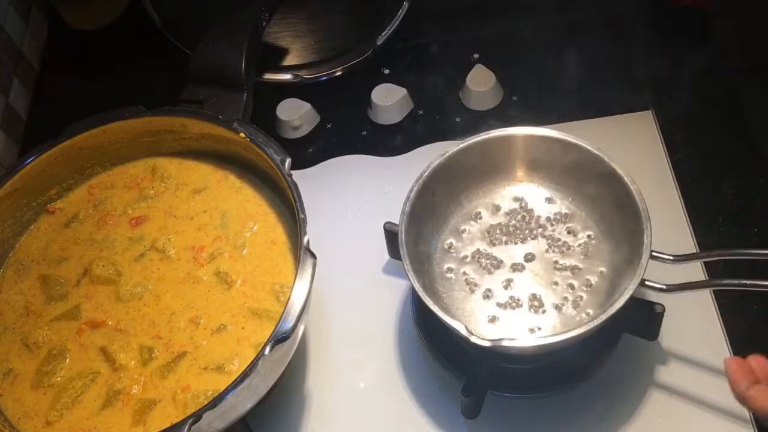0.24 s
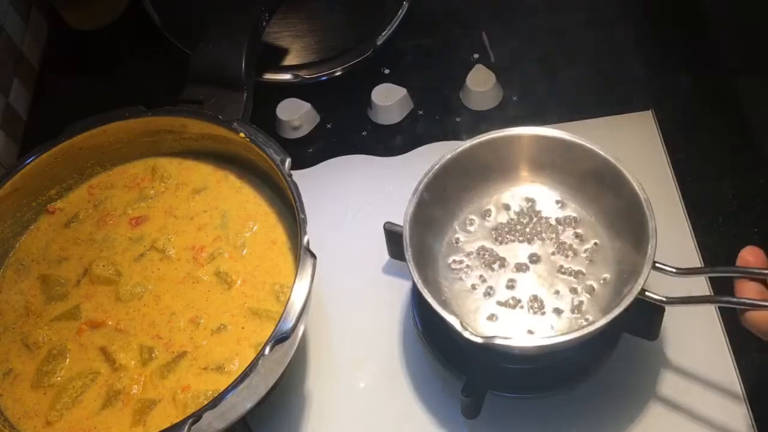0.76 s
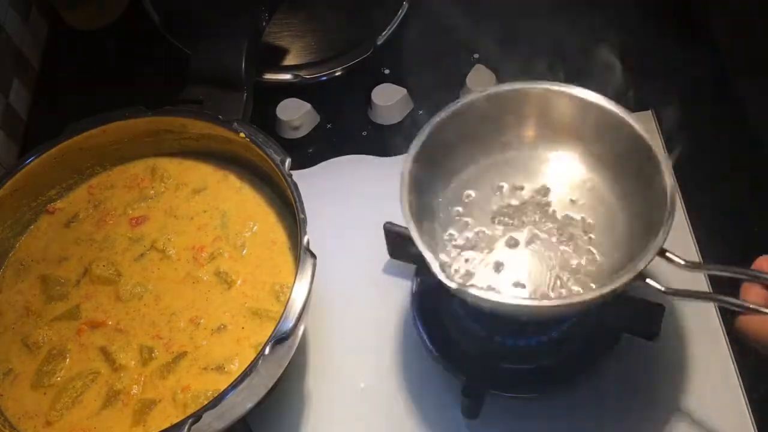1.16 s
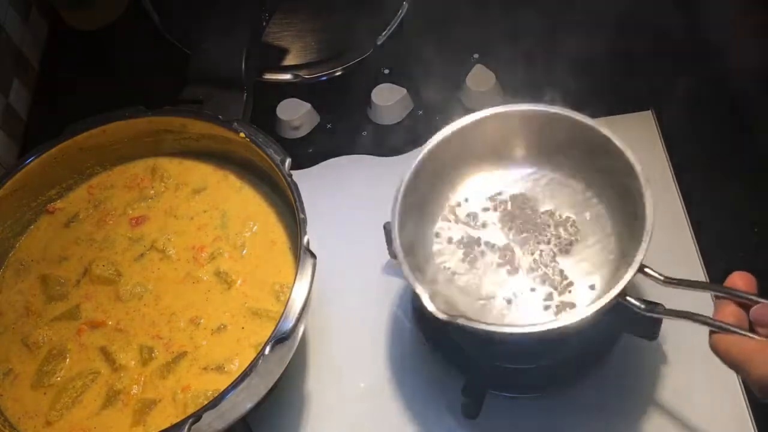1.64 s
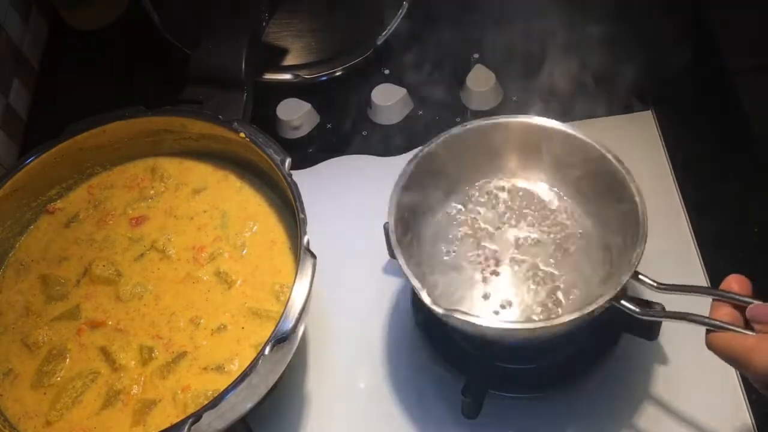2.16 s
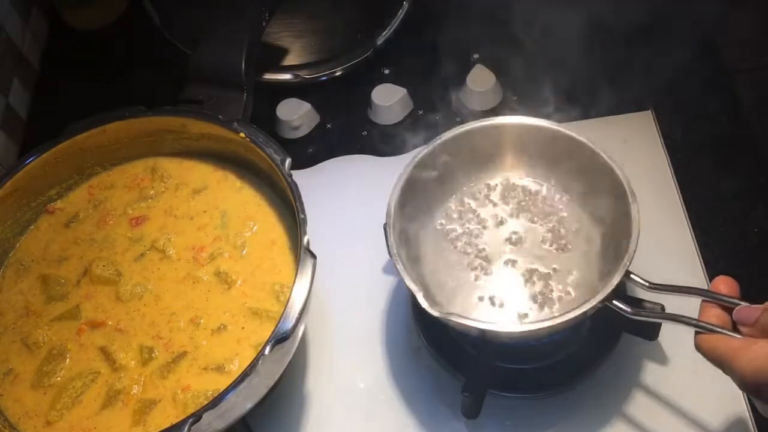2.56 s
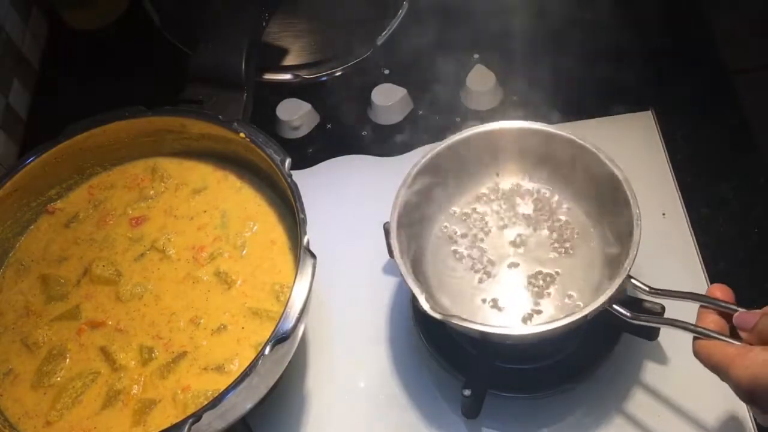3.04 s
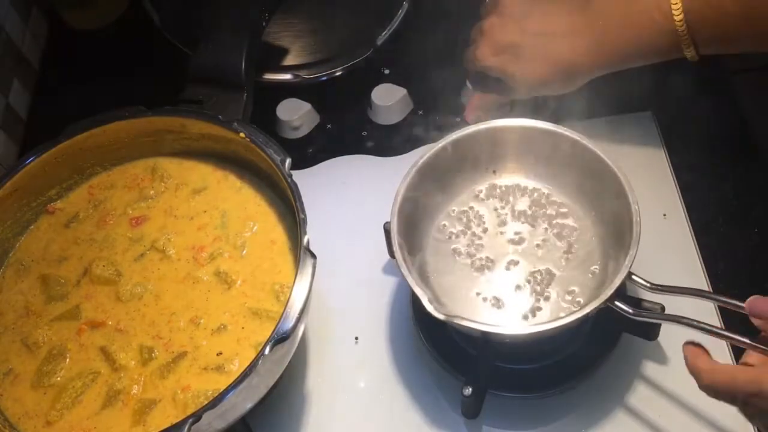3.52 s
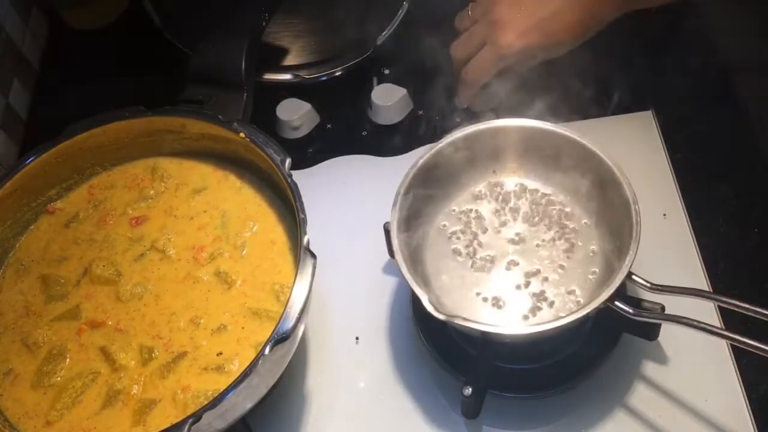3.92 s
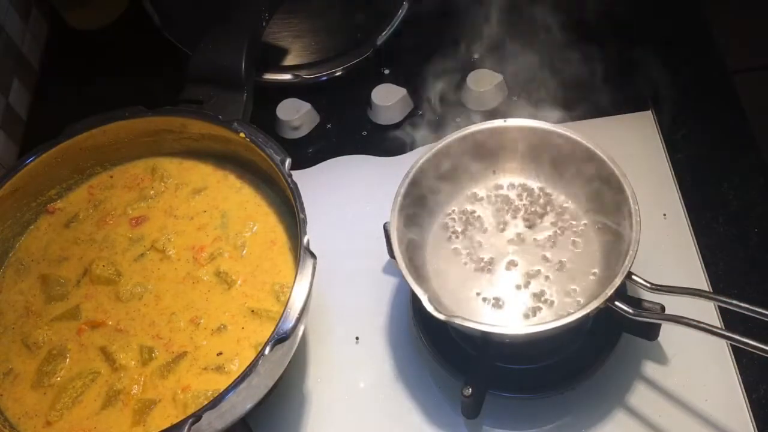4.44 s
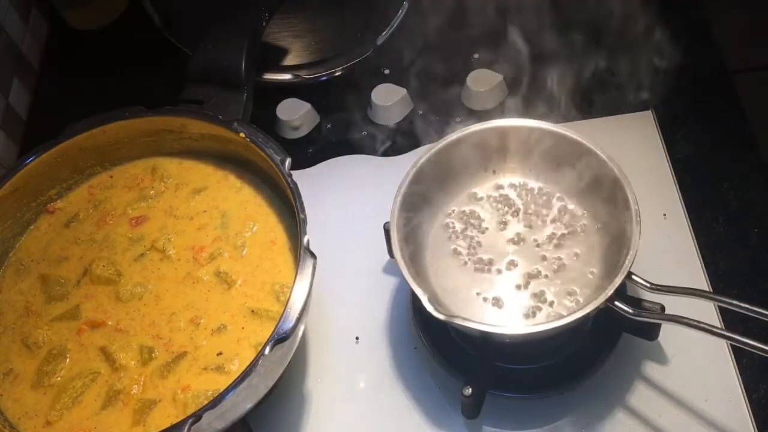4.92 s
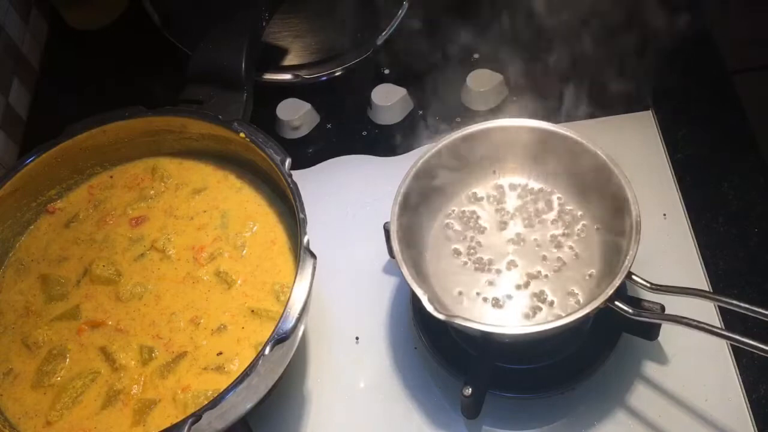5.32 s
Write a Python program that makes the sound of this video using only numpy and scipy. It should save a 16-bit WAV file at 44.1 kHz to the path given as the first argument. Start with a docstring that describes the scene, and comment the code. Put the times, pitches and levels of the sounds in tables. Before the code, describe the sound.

Close to a small steel pan on a burner in a hard-walled kitchen, seeds burst in hot oil. A low, quiet burner rush runs throughout under fine, scattered frying ticks and fizz. In the first second pops are separate, while the pan rocks softly and scrapes grittily on its stand, clearest at about 0.8. A hard pop with a low air thump comes at 1.5, then a tight flurry from 1.7 to 1.9. From 2 to 3 sharp snaps keep coming over stronger sizzle and gentle rocking. Metal clanks with a brief ringing rim at 3.0; further scrapes and knocks follow at 3.3 and 3.6. Popping is loudest and densest from about 4.0 to 5.1, with a heavy puff overloading the microphone at 4.4 and a hard snap at 4.5. It thins slightly, with a last couple of bright pops near 5.45. Short reflections and faint metallic ringing follow the pops.

```python
"""Mustard seeds in hot oil

A small steel pan on a burner in a kitchen, with a phone close by as the microphone.
Each seed bursts with a noise snap, a rattle round the bowl, faint ringing modes and a sinking steam puff.
Random ticks and fizz make the frying oil; filtered noise makes the burner's low rush.
The pan rocks and is handled: thuds, gritty scrapes, a ringing rim. A few puffs overload the microphone."""
import sys
import numpy as np
from scipy import signal
from scipy.fft import rfft, irfft
from scipy.io import wavfile

SR = 44100
rng = np.random.default_rng(int(sys.argv[2]) if len(sys.argv) > 2 else 0)


def unload_wav(signal):
    """Save mono or channel-first audio to the path in sys.argv[1] as 16-bit WAV at rate SR, clipped to [-1, 1]."""
    wavfile.write(
        sys.argv[1],
        SR,
        np.round(np.clip(np.atleast_2d(signal).T, -1, 1) * 32767).astype(np.int16),
    )


N = 245717
TIME = np.arange(N) / SR  # s
CUTOFF_HZ = 15900  # top of the phone's range


def undb(db):
    """Decibels to gain."""
    return 10 ** (np.asarray(db) / 20)


def unit(x):
    """Scale to an energy of one."""
    return x / np.sqrt(np.sum(x ** 2))


def add(out, s, x):
    """Mix a sound in at a time in seconds."""
    i = max(int(round(s * SR)), 0)
    out[i:i + len(x)] += x[:max(N - i, 0)]


def convolve(x, response):
    """Pass a sound through a response, keeping its length."""
    return signal.fftconvolve(x, response)[:len(x)]


def lowpass(x, order, hz):
    """Keep what lies below a frequency."""
    return signal.lfilter(*signal.butter(order, hz, fs=SR), x)


def highpass(x, order, hz):
    """Keep what lies above a frequency."""
    return signal.lfilter(*signal.butter(order, hz, "high", fs=SR), x)


def colour(x, points, size=2048):
    """Causal filter of unit energy through (Hz, dB) points."""
    hz, db = np.transpose(points)
    grid = np.maximum(np.fft.rfftfreq(size, 1 / SR), 1)
    log_gain = np.log(undb(np.interp(np.log(grid), np.log(hz), db)))
    # folding the cepstrum forward in time gives minimum phase
    cepstrum = irfft(log_gain)
    cepstrum[1:size // 2] *= 2
    cepstrum[size // 2 + 1:] = 0
    return convolve(x, unit(irfft(np.exp(rfft(cepstrum)))))


def resonance(x, hz, q):
    """Two-pole band-pass."""
    return signal.lfilter(*signal.iirpeak(hz, q, SR), x)


def burst(decay_s, size):
    """Noise that dies away exponentially."""
    return rng.standard_normal(size) * np.exp(-TIME[:size] / decay_s)


# Sheet-metal stove top. Each row: resonance in Hz, sharpness Q, level in dB.
STOVE_MODES = [(305.2, 51, 12), (420, 8.9, 3), (547, 45, 5), (649, 80, 12)]


def stove_top(x, gain):
    """The sheet metal hums along with whatever shakes it."""
    hum = sum(undb(db) * resonance(x, hz, q) for hz, q, db in STOVE_MODES)
    return x + gain * hum


# Colour of the burner's rush in the kitchen. Each row: frequency in Hz, relative level in dB.
BURNER_COLOUR = [(20, -24), (55, 9.5), (100, 1), (160, 3.5), (250, -12), (500, -13), (1000, -14.5),
                 (2000, -20.5), (3300, -24.5), (6000, -19), (10000, -18.5), (16000, -21)]


def burner():
    """The burner's steady low rush is coloured noise that also shakes the stove top."""
    rush = colour(rng.standard_normal(N), BURNER_COLOUR)
    return undb(-45.0) * stove_top(rush, gain=0.63)


# How hard the oil fries by itself. Each row: time in seconds, level in dB.
FRYING = [(0, -50), (.4, -60), (1, -58), (1.33, -46), (2, -53), (2.45, -43.5), (3.05, -45), (3.35, -42.5),
          (3.9, -45), (4.7, -47.5), (5.25, -46.5), (5.57, -53.5)]


def frying_level(stir_db=-54, calm_s=0.079):
    """The oil fries on by itself; every burst stirs it up, and it calms again."""
    stirred = np.zeros(N)
    for s, _, rattle_db, _ in POPS:
        add(stirred, s, undb(rattle_db + stir_db) * np.exp(-TIME[:SR // 2] / calm_s))
    steady = undb(np.interp(TIME, *np.transpose(FRYING)))
    return np.hypot(steady, stirred)


# Colour of the steel bowl, for the oil and the rattles. Each row: frequency in Hz, relative level in dB.
BOWL_COLOUR = [(150, -32), (700, -0.5), (1050, 7.5), (1900, 1), (2300, 2), (2900, 1.5), (4900, -1.5),
               (5400, -2.5), (7500, -7.5), (9700, -4), (10400, -7), (11500, -3.5), (15500, -6.5)]


def oil(ticks_per_s=330, spread_db=5.0, crackle_db=-2.0, fizz_db=-9, dull_hz=11000):
    """Many tiny bubbles break at the surface as scattered ticks, over a soft noise fizz."""
    sizes = undb(spread_db * np.minimum(rng.exponential(size=N), 5))
    ticks = (rng.random(N) < ticks_per_s / SR) * sizes * rng.choice([-1, 1], N)
    scatter = 0.63 * burst(0.0036, size=1024)
    scatter[0] += 2  # the direct tick
    crackle = unit(convolve(ticks, scatter)) * np.sqrt(N)
    bubbles = undb(crackle_db) * crackle + undb(fizz_db) * rng.standard_normal(N)
    # bursting under a film of oil, they are duller than the seeds
    bubbles = lowpass(bubbles, 1, dull_hz)
    return frying_level() * colour(bubbles, BOWL_COLOUR)


def small_seeds(least_db=-24, spread_db=1.5, count=110):
    """Rows (s, strength dB) of faint ticks at random times, louder when the oil fries harder."""
    when, size = rng.random((count, 2)).T
    s = when * N / SR
    frying_db = np.interp(s, *np.transpose(FRYING))
    size_db = -spread_db * np.log(np.maximum(size, np.exp(-2)))
    return np.column_stack([s, least_db + size_db + (frying_db - frying_db.mean()) / 2])


def jolted_seeds(weaker_db=-17, spread_db=3, soonest_s=0.0068, within_s=.04):
    """Rows (s, strength dB): each listed burst sets off a weaker neighbour just after it."""
    s, _, rattle_db, _ = np.transpose(POPS)
    delay, size = rng.random((len(s), 2)).T
    strength_db = rattle_db + weaker_db + spread_db * (2 * size - 1)
    return np.column_stack([s + soonest_s + within_s * delay, strength_db])


def brighten(x, db, split_hz=8300):
    """Tip the balance between the treble above the split and all below it, at unit energy."""
    # the bands meet in opposite phase at the split, so one is subtracted
    return unit(lowpass(x, 2, split_hz) * undb(-db / 2) - highpass(x, 2, split_hz) * undb(db / 2))


# Colour of a husk's snap. Each row: frequency in Hz, relative level in dB.
SNAP_COLOUR = [(150, -10.5), (700, 0.5), (1600, 2.5), (2700, 2.5), (4200, 0), (6000, 4.5), (7600, -0.5),
               (9200, -1), (10500, -14), (12000, -1), (15500, -2)]
# Overall levels of snap and rattle, treble tilt of weak bursts, and its change per dB of a harder snap.
SNAP_DB, RATTLE_DB, BRIGHT_DB, BRIGHT_PER_DB = 1, 4, 9.5, -0.11
# Seed bursts. Each row: start in seconds, then relative levels in dB of the snap,
# the rattle in the bowl and the steam puff.
POPS = [(0.0192,4,-1,-33), (.3,-17,-14,-38), (0.4513,-0.5,-27,4.5), (.47,11.5,3,4.5), (0.5279,-7,-10.5,-16),
        (.609,2,0,-35), (0.659,3,-0.5,-40), (.779,5.5,5.5,-26), (1.0497,13,4,5.5), (1.1729,-1.5,-5,-34),
        (1.2174,-7,5.5,-6), (1.2413,10.5,-3,-1), (1.4618,13.5,9.5,15), (1.5131,9,4.5,-12),
        (1.67,-0.5,-4,-20), (1.6857,9,5,-26), (1.6963,12,5,17.5), (1.7076,4,8.5,5.5), (1.773,-13,-1,-25),
        (1.7959,-0.5,-13,-31), (1.8216,2,1.5,8), (1.8396,6,-5,-20), (1.847,-3,2,-19), (1.8678,2.5,-3,-28),
        (1.9191,0,-2.5,-36), (2.0278,-2,8.5,-28), (2.046,1,1.5,-30), (2.108,-8,-8.5,-17), (2.1644,16,6.5,1),
        (2.1765,0,-11,-29), (2.1804,2,6.5,-16), (2.233,1.5,1,0), (2.2839,9,7.5,-30), (2.3102,2,-6,-11),
        (2.3341,16,-14,11), (2.4124,-3.5,-4,-27), (2.432,-4,-0.5,-31), (2.515,13.5,1.5,0.5),
        (2.5832,8.5,9.5,-36), (2.766,8,6.5,2.5), (2.7724,10,8,-32), (2.835,2,1,-22), (2.9321,-2.5,2.5,-2),
        (2.9802,-4,2.5,-11), (3.0593,1.5,6,-3.5), (3.1165,4.5,5,-2), (3.2408,-1,4.5,-5),
        (3.3685,-2.5,-7.5,-20), (3.417,6,6,-13), (3.4424,12.5,8.5,12.5), (3.5541,7.5,4,-18),
        (3.6956,8,10,10), (3.78,6,7,-6.5), (3.8382,2.5,2.5,-15), (3.8993,-3,2,-30), (3.9515,-4,3,-22),
        (3.9714,13.5,10,-16), (3.9925,18.5,4,14.5), (4.0142,6,0,-2), (4.0876,14,11.5,-2.5),
        (4.1586,13,10,12.5), (4.2,10,8,-5.5), (4.244,7.5,6.5,-30), (4.3073,10,1.5,-1.5),
        (4.3398,8.5,7.5,-1), (4.4272,3,5,16), (4.5104,19,9,7.5), (4.6954,1.5,-2.5,-13), (4.793,7,3,6),
        (4.846,10,4,2), (4.8854,15,10,14), (4.922,6,0,-30), (4.9377,10,7,-9), (4.965,2,-7,-34),
        (5.0005,3,-7,-8), (5.0523,6,2,9.5), (5.0899,10.5,5.5,-2), (5.1719,-0.5,-7,-25), (5.206,6,2.5,-6),
        (5.428,12.5,5,-11), (5.473,9,4.5,-9)]


def seeds(snap_s=.0001, rattle_s=0.0089, echo=0.18, echo_s=.0047, hollow_hz=1500, husk_hz=7000, size=2048):
    """A husk splits with a snap, which then scatters between the walls of the bowl."""
    snaps, rattles = np.zeros(N), np.zeros(N)
    faint = [(s, db, db) for s, db in np.vstack([small_seeds(), jolted_seeds()])]
    for s, snap_db, rattle_db in np.vstack([np.array(POPS)[:, :3], faint]):
        # weak bursts are thin and bright, a harder snap is fuller
        bright_db = BRIGHT_DB + BRIGHT_PER_DB * max(snap_db, 0)
        crack = 0.73 * burst(snap_s, size)
        crack[0] += 2
        # the later reflections arrive in clumps of 16 samples
        clumps_db = 2.5 * np.repeat(rng.standard_normal(size // 16), 16)
        rattle = burst(rattle_s, size) * undb(clumps_db)
        # every husk has its own size, and so its own short note
        note_hz = min(husk_hz * 2 ** rng.uniform(-.6, .9), CUTOFF_HZ)
        crack = crack + 1.3 * resonance(crack, note_hz, 5)
        rattle = rattle + 1.3 * resonance(rattle, note_hz, 5)
        snap = undb(snap_db) * brighten(crack, bright_db)
        add(snaps, s, snap)
        # one clear reflection comes back from a surface nearby
        add(snaps, s + echo_s * (1 + 0.03 * rng.standard_normal()), echo * snap)
        add(rattles, s, undb(rattle_db) * brighten(rattle, bright_db))
    # the small bowl holds on to short waves only
    rattles = highpass(rattles, 1, hollow_hz)
    return undb(SNAP_DB) * colour(snaps, SNAP_COLOUR) + undb(RATTLE_DB) * colour(rattles, BOWL_COLOUR)


# Modes of the steel pan. Each row: frequency in Hz, level in dB, time to fall by 60 dB in seconds.
PAN_MODES = [(1000, -9, .14), (1290, -11, .2), (2250, -5, .22), (3330, -5, .2), (4310, 1.5, .26),
             (5430, 2, .2), (5960, -4, .15), (6540, 2, .2), (7450, -5, .18), (8340, -5, .18),
             (9120, -3, .16), (11400, -6, .15)]
RING_DB = -16  # ring relative to the listed rattle level


def pan_ring(size=10240):
    """Each seed wakes its own mix of steel modes, and the moving oil detunes them a little."""
    out, t = np.zeros(N), TIME[:size]
    hz, db, t60 = np.transpose(PAN_MODES)
    fades = undb(db[:, None] - 60 * t / t60[:, None])
    for s, _, rattle_db, _ in POPS:
        detune, mix = rng.standard_normal((2, len(hz)))
        mode_hz = hz * (1 + .007 * detune)
        waves = np.sin(np.outer(2 * np.pi * mode_hz, t).astype(np.float32))
        add(out, s, undb(rattle_db + RING_DB) * unit(mix @ (fades * waves)))
    return out


def pan_body(x, gain=.45, width_hz=90):
    """The steel of the pan favours its own notes in whatever sounds inside it."""
    notes = sum(undb(db) * resonance(x, hz, hz / width_hz) for hz, db, _ in PAN_MODES)
    return x + gain * notes


def sinking_wave(t, rest_hz, turns, onset_s):
    """The microphone's answer to a push of air: a swing that slows down cycle by cycle."""
    return np.sin(2 * np.pi * (rest_hz * t + turns * np.log1p(t / onset_s)))


# Puffs that hit the microphone. Each row: start in seconds, level in dB,
# decay in seconds, onset of the swing in seconds.
THUMPS = [(1.4616, 6, .0098, .00014), (4.4277, 12, .0112, .000175)]


def puffs(size=4096):
    """Steam leaves each seed in a puff; stronger puffs last longer up to a limit, direct hits thump."""
    out, t = np.zeros(N), TIME[:size]
    for s, _, _, puff_db in POPS:
        decay_s = min(0.00017 + 0.018 * undb(puff_db), .008)
        fade = np.exp(-t / decay_s) / (1 + t / 0.000043) ** 0.63
        wave = sinking_wave(t, 19, turns=0.47, onset_s=.00006)
        add(out, s + .0001, undb(puff_db) * unit(wave * fade))
    for s, db, decay_s, onset_s in THUMPS:
        push = (1 - np.exp(-t / .0015)) ** 2 * np.exp(-t / decay_s)
        add(out, s, undb(db) * push * sinking_wave(t, 24, turns=.53, onset_s=onset_s))
    return out


def thud(hz, ring, rise_s=0.0038, ring_s=0.027, size=8192):
    """A soft blow of the pan on its stand, and the rumble of the stove's body with it."""
    t = TIME[:size]
    blow = np.sin(2 * np.pi * hz * t) * t / rise_s * np.exp(1 - t / rise_s)
    body = resonance(resonance(burst(ring_s, size), hz, 1.4), hz, 1.4)
    return blow + ring * body / np.abs(body).max()


ROCK_HZ, KNOCK_HZ = 143, 301  # low note of the stove, higher note of its sheet metal
# Spells of rocking on the stand. Each row: start in seconds, end in seconds,
# time between tips in seconds, relative level of a tip in dB.
ROCKING = [(0.076, .85, .1195, -28.5), (1.152, 1.37, .149, -31), (2.003, 3.05, .109, -32),
           (3.354, 3.56, .137, -31)]


def stove(lag_s=0.00507):
    """The pan tips evenly to and fro or is knocked against its stand, and the stove top hums on."""
    out = np.zeros(N)
    for start, end, period, db in ROCKING:
        for s in np.arange(start, end, period):
            tip_hz = ROCK_HZ * (1 + 0.11 * rng.standard_normal())
            add(out, s, undb(db) * thud(tip_hz, ring=0.48))
    for s, *_, db in KNOCKS:
        # a knock sounds the low note of the stove and the higher note of its sheet metal
        low = undb(db + 0.5) * thud(ROCK_HZ, ring=0.89)
        high = undb(db - 4.5) * thud(KNOCK_HZ, ring=.8)
        add(out, s + lag_s, low + high)
    return stove_top(out, gain=0.77)


# Rim of the pan where it meets the stand. Each row: mode in Hz, level in dB, time to fall by 60 dB in
# seconds, before damping.
RIM_MODES = [(1940, -13, 0.69), (2263, -0.5, 0.066), (2370, -17, 0.13), (3130, -7, 0.039)]
# The pan is shifted on the burner. Each row: start in seconds, scrape level in dB, scrape centre in Hz,
# sharpness Q, ring of the rim in dB, thud of the stove in dB (relative).
KNOCKS = [(0.586, -31, 1150, 3, -49, -41.5), (.7, -32, 1150, 2.8, -52, -48),
          (0.76, -11, 1350, 2.8, -32, -46), (.785, -11, 1300, 2.8, -51, -37.5),
          (.914, -25.5, 1280, 0.79, -35, -27.5), (1.302, -50, 1980, 2, -33.5, -54),
          (2.965, -15, 1260, 1.2, -20, -36), (2.986, -13, 1280, 0.9, -22, -34),
          (3.004, -33, 1100, 1.9, -27.5, -31), (3.02, -22.5, 1060, 1.9, -42, -32),
          (3.287, -16.5, 1070, 1.1, -32, -25), (3.614, -24, 850, 1.4, -53, -38)]


def clanks(skirt=0.51, rise_s=0.00092, decay_s=0.0093, top_hz=3000, grip_s=0.0042, size=8192):
    """Short gritty scrapes of steel on steel; the rim rings, damped by the hand."""
    out, t = np.zeros(N), TIME[:size]
    rim = np.zeros(size)
    for hz, db, t60 in RIM_MODES:
        rim += undb(db) * np.sin(2 * np.pi * hz * t) * np.exp(-np.log(1000) * t / t60)
    for s, db, hz, q, rim_db, _ in KNOCKS:
        grit = burst(decay_s, size) * rng.exponential(size=size) * (1 - np.exp(-t / rise_s))
        band = resonance(grit, hz, q)
        scrape = lowpass(resonance(band, hz, q) + skirt * band, 3, top_hz)
        # the harder the push, the tighter the grip and the shorter the ring
        damping = np.exp(-t * undb(db) / grip_s)
        add(out, s, undb(db) * scrape / np.abs(scrape).max() + undb(rim_db) * rim * damping)
    return out


def room(x, low_t60=0.39, high_t60=0.49, split_hz=5000, size=22050):
    """Hard kitchen walls as two bands of decaying noise; the treble lingers a little longer."""
    low = lowpass(burst(low_t60 / np.log(1000), size), 2, split_hz)
    high = highpass(burst(high_t60 / np.log(1000), size), 2, split_hz)
    build_up = 1 - np.exp(-TIME[:size] / 0.0009)
    return convolve(x, unit((low + 1.5 * high) * build_up))


def scene():
    """Pan, stove and the low rush of the burner in the kitchen."""
    frying = undb(0.5) * pan_body(seeds() + oil())
    handling = clanks() + stove()
    walls = room(undb(-15) * frying + undb(-4.5) * handling)
    return (frying + handling + puffs() + pan_ring() + walls + burner())[None]


def gain_control(x, knee_db=-16, release_s=0.093, lag_size=1500):
    """The gain drops a moment (lag in samples) after a long loud blow and creeps back."""
    keep = np.exp(-1 / (release_s * SR))
    power = signal.lfilter([1 - keep], [1, -keep], x[0] ** 2)
    power = np.concatenate([np.zeros(lag_size), power])[:N]
    return x / np.sqrt(1 + power / undb(knee_db) ** 2)


def record(dry):
    """The phone clips the sharpest peaks, ducks after loud blows and cuts the top."""
    clipped = np.clip(dry, -1, 1)
    top_cut = signal.ellip(10, .1, 85, CUTOFF_HZ, fs=SR, output="sos")
    return signal.sosfilt(top_cut, gain_control(clipped))


dry = scene()
out = record(dry)
unload_wav(out)
```